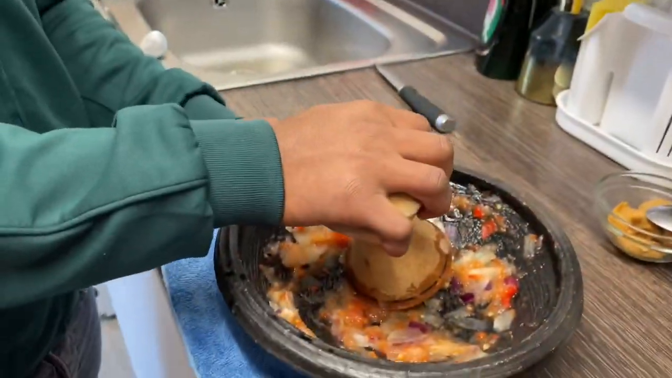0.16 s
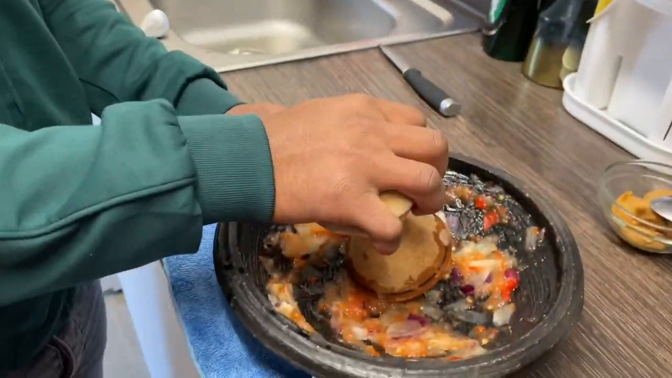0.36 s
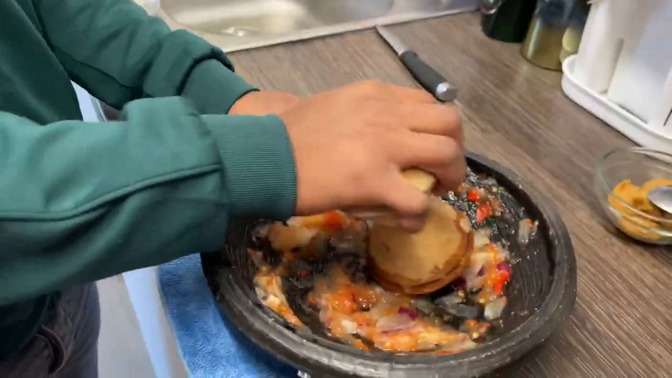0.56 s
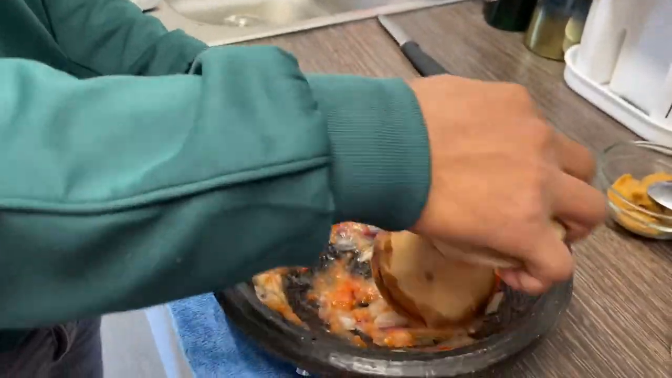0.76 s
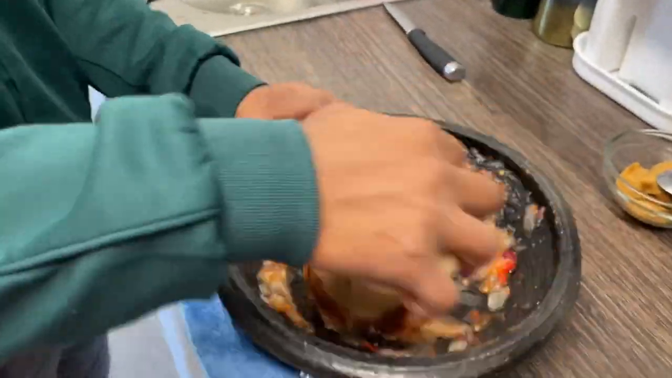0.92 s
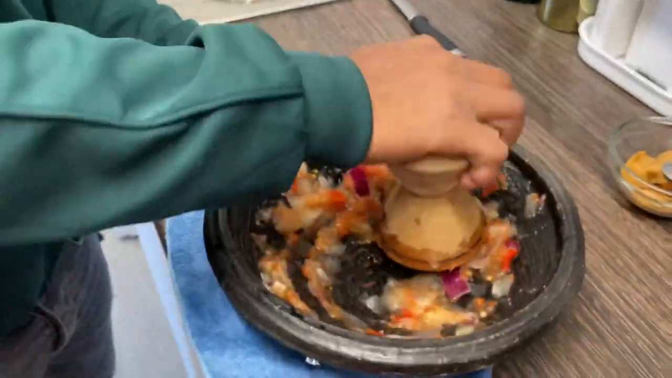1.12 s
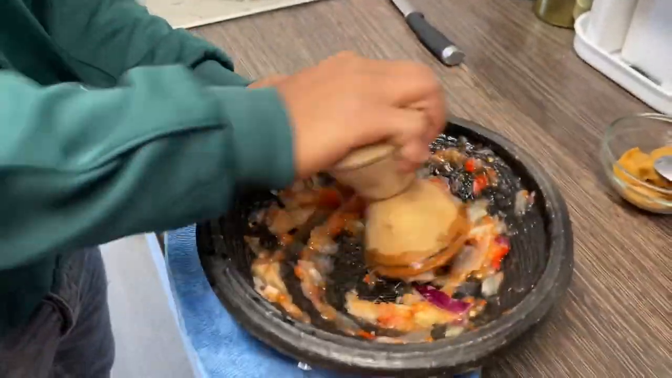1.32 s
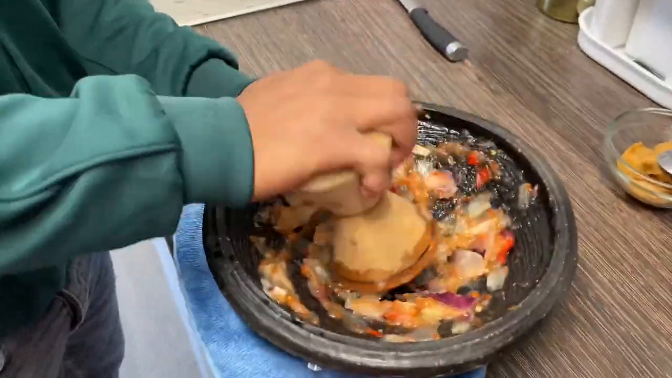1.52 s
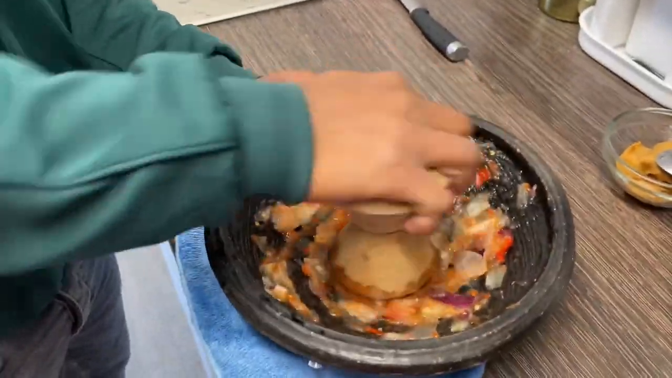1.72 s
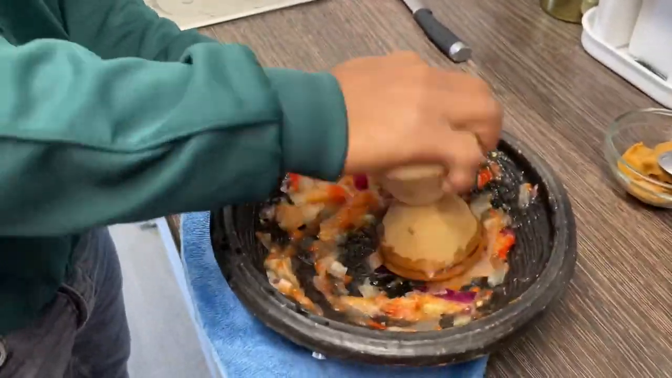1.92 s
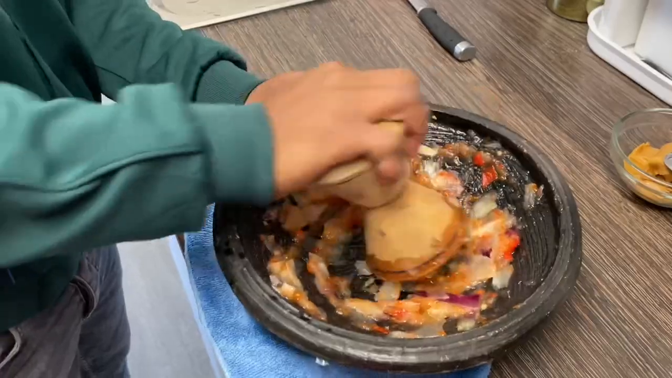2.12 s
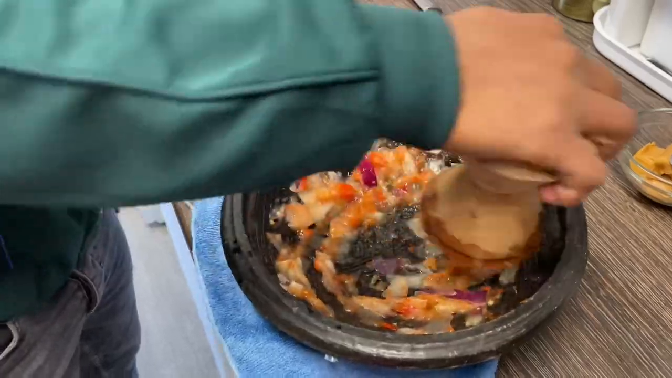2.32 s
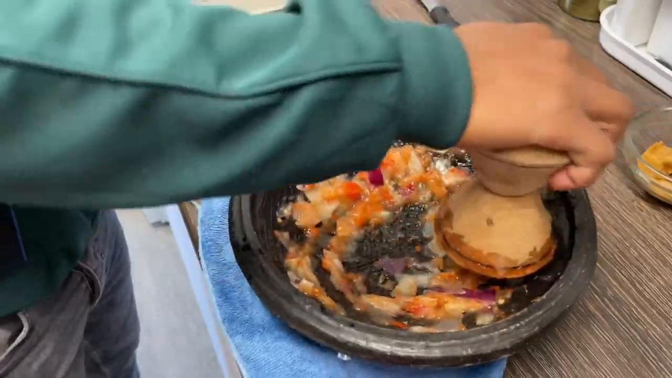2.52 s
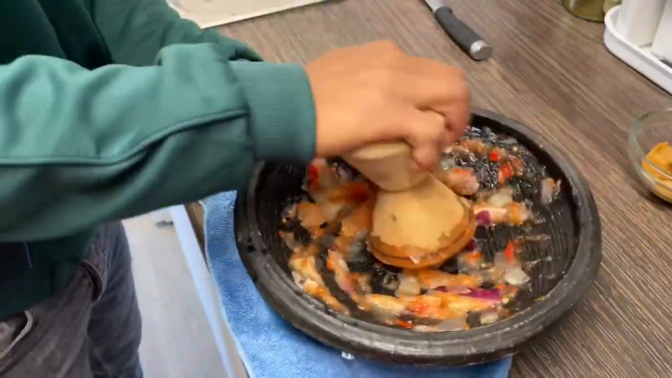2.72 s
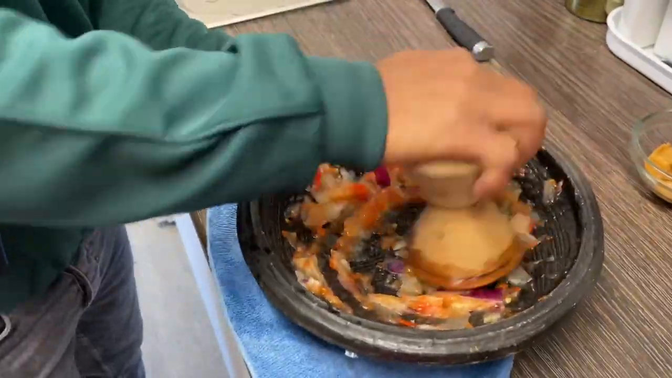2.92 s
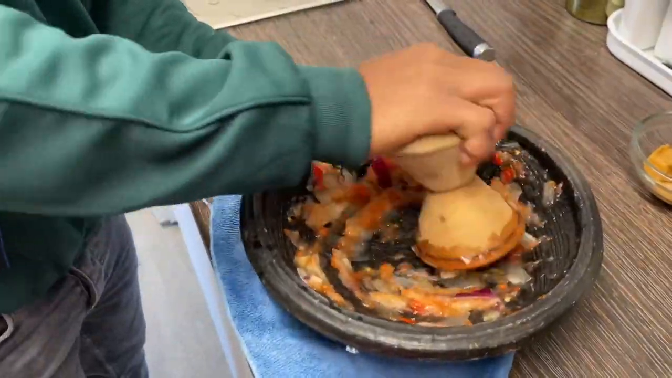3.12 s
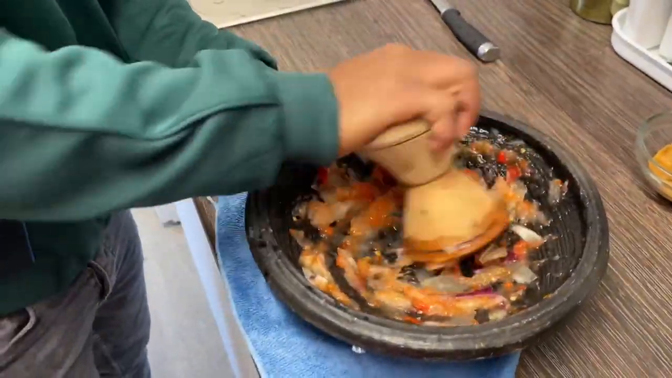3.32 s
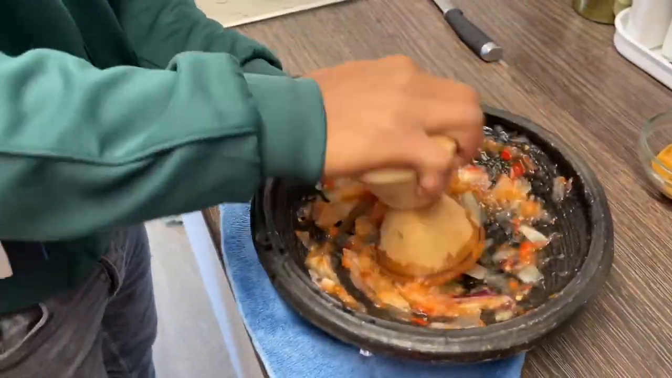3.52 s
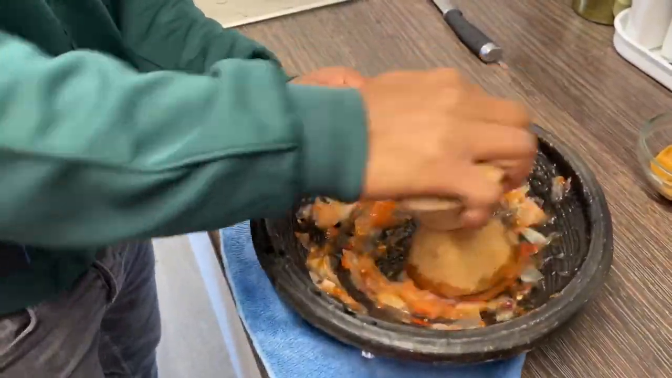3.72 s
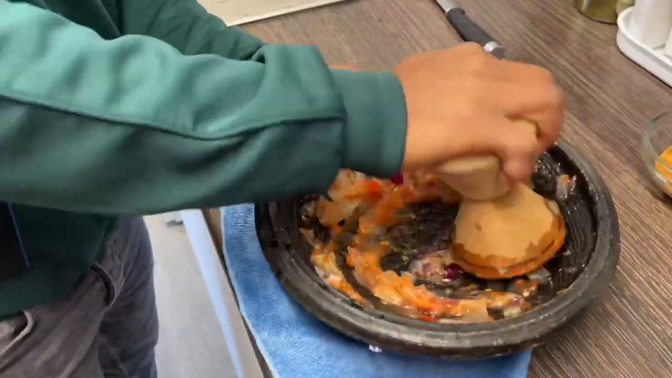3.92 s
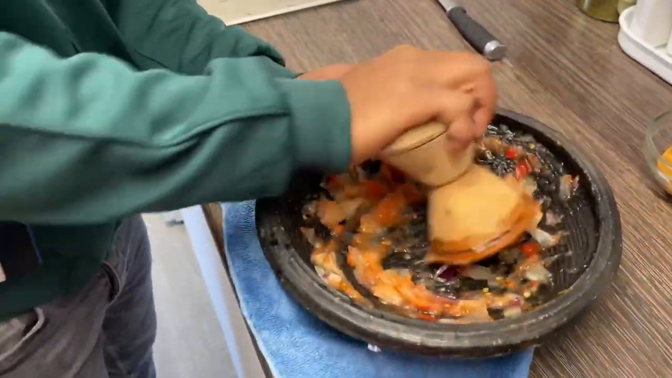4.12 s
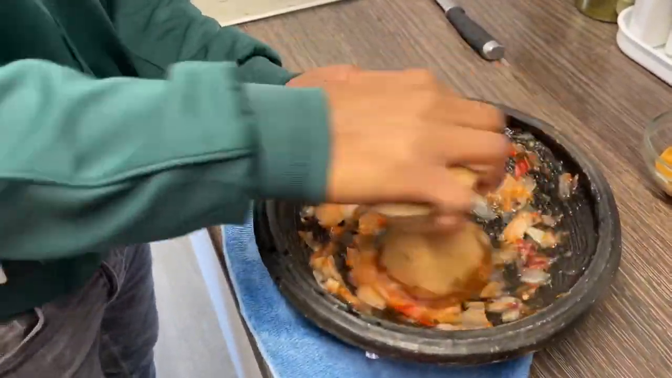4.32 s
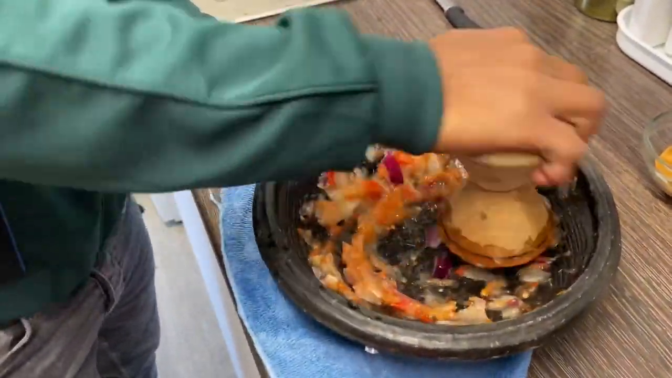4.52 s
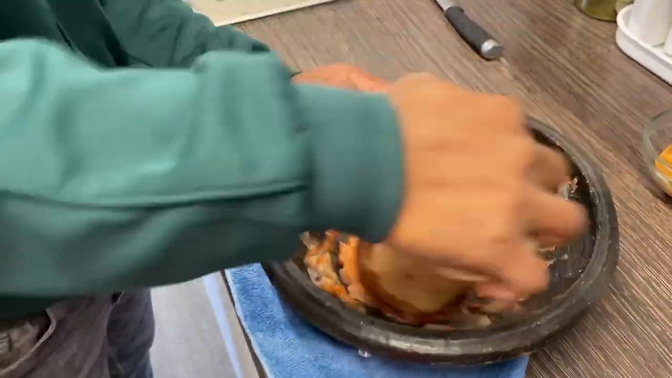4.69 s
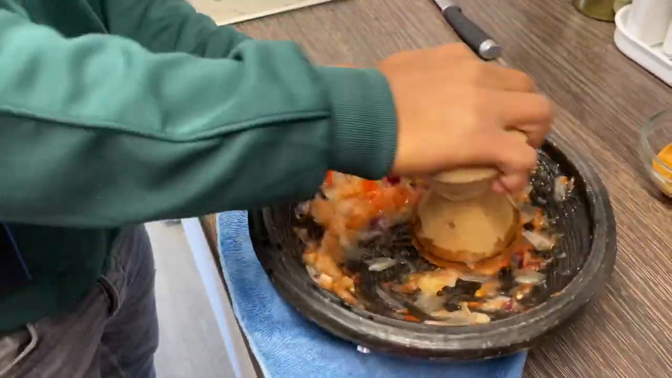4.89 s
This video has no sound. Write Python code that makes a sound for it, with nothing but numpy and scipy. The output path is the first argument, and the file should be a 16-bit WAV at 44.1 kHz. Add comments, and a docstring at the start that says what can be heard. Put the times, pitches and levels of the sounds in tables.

```python
"""On a kitchen counter, close to a phone, a wooden pestle is rocked hard in a ridged clay bowl.
Pushes swing the counter in low thuds; knocks ring the bowl's modes; the hand's weight trembles below.
Vegetable fibres snap in short noise bursts; sparse grains through resonances make scrape, rattle and crackle.
A steady filtered hiss and a short noise tail make the small room; two ports hear the treble out of step."""
import sys
import numpy as np
from scipy import signal
from scipy.fft import rfft, irfft, next_fast_len
from scipy.io import wavfile
from scipy.ndimage import map_coordinates

SR = 44100
rng = np.random.default_rng(int(sys.argv[2]) if len(sys.argv) > 2 else 0)


def to_wav(s):
    """Save 16-bit WAV."""
    ch = np.atleast_2d(s).T  # columns
    pcm = np.round(np.clip(ch, -1, 1) * 32767)  # PCM
    wavfile.write(sys.argv[1], SR, pcm.astype(np.int16))


def volts_from_decibels(level):
    """Turn decibel levels (scalar or array-like) into linear amplitude factors."""
    exponent = np.asarray(level, float) / 20
    return 10 ** exponent


N = 222822

# steady background, part shared by the ports and part opposed: hz, level_db (relative)
HISS_SHARED = [(15, -51), (30, -7), (50, -11), (97, 2), (237, -6), (628, -12.5), (800, -20.5),
               (1600, -14.5), (1900, -25), (2500, -45), (3100, -24), (4300, -20.5), (6200, -25.5),
               (7800, -28.5), (11000, -31), (12700, -22.5), (16200, -30)]
HISS_OPPOSED = [(15, -57.5), (25, -40), (70, -1), (271, -4), (310, -7.5), (869, -13.5), (1530, -16.5),
                (2070, -19.5), (5340, -20.5), (9170, -14), (9950, -21), (12700, -24.5), (16200, -52)]
# narrow bands standing out of the hiss: centre_hz, width_hz, lift_db
HISS_BANDS = [(273, 15, 2.5), (1382, 240, 10), (4190, 280, 7.5), (5174, 115, 12), (10070, 136, 14),
              (12190, 360, 10)]
# strokes over the ridges, a time below 5 ms acting as 5 ms:
# full_pressure_s, hold_s, scrape_db, wet_crackle_db, rise_20db_s, fall_20db_s
STROKES = [(0.493, 0.01, -57.5, -62, 0.18, 0), (0.536, .01, -56, -71.5, 0.3, 0.05),
           (0.565, 0.01, -53.5, -60, -0.12, -0.14), (0.9, .03, -54, -51, 0.2, 0),
           (0.96, .07, -48.5, -54, -0.05, 0.16), (1.137, .02, -51.5, -55, -0.55, 0.1),
           (1.24, .015, -47.5, -58, 0, 0), (1.28, 0.05, -45.5, -47.5, 0.09, 0.22),
           (1.468, 0.068, -46.5, -50, -0.4, 0.15), (1.58, 0.021, -49, -55.5, -0.33, 0.34),
           (1.73, .04, -52, -47, -0.47, 0), (1.81, 0.049, -45.5, -47, -0.12, 0.1),
           (1.921, .06, -55, -59, -0.4, 0.5), (2.008, 0.013, -50, -62, -0.5, 0.02),
           (2.081, 0.071, -47, -58.5, -0.5, 0.04), (2.2, .01, -51.5, -49, -0.22, -0.1),
           (2.598, .03, -55, -51.5, -0.13, 0.05), (2.695, .02, -50.5, -56.5, 0.03, -0.36),
           (2.783, 0.02, -41.5, -52, -0.15, 0.05), (2.76, 0.014, -53.5, -60, -0.06, 0.1),
           (2.881, 0.013, -46, -47.5, -0.26, 0), (2.92, 0.037, -53, -51.5, 0, 0.5),
           (3.03, 0.021, -47.5, -50, -0.17, 0.1), (3.05, 0.0097, -41, -42.5, -0.07, 0),
           (3.08, 0.021, -44.5, -42, -0.22, 0), (3.149, .1, -55.5, -62, 0, 1.3),
           (3.283, 0.048, -42, -45, -0.15, 0.01), (3.38, 0.041, -50, -49.5, -0.3, 0.5),
           (3.535, .02, -42, -53.5, 0.01, -0.2), (3.56, 0.043, -39, -52, 0.06, -0.1),
           (3.62, 0.017, -47.5, -46.5, -0.42, -0.33), (3.68, 0.067, -52.5, -56, 0.4, -0.2),
           (3.8, .03, -43.5, -49, 0.03, -0.04), (3.83, 0.036, -40, -42.5, 0, -0.14),
           (3.9, 0.018, -54, -55, 0.6, 0.2), (3.99, .02, -53.5, -53, 0.15, 0.5),
           (4.035, .01, -46, -46, -0.23, -0.05), (4.07, .025, -49.5, -51, -0.04, 0),
           (4.113, 0.018, -40.5, -47.5, -0.15, 0.08), (4.159, .015, -50, -61, -0.4, 0.06),
           (4.222, 0.11, -57, -52, -1.8, 0), (4.383, 0.023, -49, -47, -0.05, 0),
           (4.416, .04, -43, -46.5, 0, 0.1), (4.485, 0.024, -48, -46, -0.35, 0),
           (4.699, .06, -53.5, -51.5, 0, 0), (4.785, 0.048, -41, -42.5, 0.02, 0.03),
           (4.85, .04, -54, -53.5, -0.35, 0.1), (4.985, 0.011, -48.5, -58, -0.8, 0.1),
           (5.035, .03, -45.5, -56, -0.3, 6)]
# floor between strokes: rattle_db, scrape_db, crackle_db
REST_LEVELS = (-57, -72, -58.5)
# the hand's steady weight, trembling through the counter: time_s, level_db
HAND_WEIGHT = [(0, -53.5), (0.6, -50.5), (0.84, -51.5), (0.95, -30), (1.1, -45.5), (1.6, -41), (2.2, -40),
               (2.32, -51.5), (2.45, -42.5), (3.2, -42), (3.6, -39), (4.5, -41), (4.6, -47.5), (4.75, -50),
               (5.05, -36)]
# colour of the counter's tremble: hz, level_db (relative)
COUNTER_COLOUR = [(15, -61), (25, -26), (65, -0.5), (113, 1.5), (144, -4), (203, -19.5), (231, -21),
                  (257, -55), (330, -25), (430, -99), (730, -120)]
# squeak pitches of the ridges under the wood: pitch_hz, width_hz, level_db
RIDGES = [(873, 304, -3), (1540, 720, -3.5), (1950, 200, -3.5), (2174, 68, -6), (2650, 150, -6.5),
          (3030, 710, -9), (3705, 81, -10.5), (4570, 190, -9)]
# colour of the treble of snaps and pulp: hz, level_db (relative)
FIZZ = [(1000, -26), (2500, -13), (5200, -3.5), (6200, -10), (9000, 3), (10200, -11.5), (12800, -13),
        (14000, -15.5), (15800, -22), (17000, -58)]
# tilt of the pulp's fine crackle over that colour: hz, gain_db
PULP_TILT = [(3000, 1), (6500, -2), (11000, -0.4)]
# the bowl's modes: mode_hz, level_db, undamped_t60_s
BOWL_MODES = [(271, 2, 0.18), (365.5, 2, 0.12), (434, 5, 0.12), (500, 5, 0.11), (590, -2, 0.092),
              (647, 3, 0.075), (763, -0.5, 0.045), (872, 3, 0.078), (1029, 0, 0.076), (1230, -1, 0.06),
              (1465, -2.5, 0.064), (1786, -7.5, 0.068), (2020, -9, 0.072), (2520, -13.5, 0.12)]
# pestle against the bowl: start_s, level_db, contact_ms, favoured_hz, spread_octaves, damping (1 = free)
KNOCKS = [(0.3339, -27, 3.6, 655, 0.14, 2.9), (0.381, -26, 2.1, 640, 0.13, 2.9),
          (0.42, -27, 2.3, 598, 0.15, 3.3), (.460, -27, 2, 606, 0.17, 3.5),
          (.888, -32, 1.2, 890, 1.55, 2.4), (.900, -26, 0.35, 563, 0.89, 5.1),
          (.931, -24.5, 2.3, 623, 0.3, 2.5), (.977, -24.5, 3.9, 623, 0.36, 6.4),
          (1.138, -38.5, 1.9, 630, 1.1, 0.99), (1.463, -33.5, 1.1, 510, 1.14, 7.5),
          (1.72, -25.5, 1.1, 720, 1.1, 2), (2.3648, -13, 0.5, 1190, 1.24, 2.6),
          (3.297, -41.5, 1, 500, 1.3, 1.3), (3.557, -43, 1.4, 633, 1.1, 1.5),
          (3.755, -29.5, 1.6, 590, 0.14, 4.4), (4.415, -35, 2.4, 560, 1, 2.9),
          (4.44, -35.5, 1.3, 860, 0.24, 4.8), (4.628, -29.5, 0.52, 1194, 0.088, 5.3),
          (4.633, -32, 1.8, 434, 0.085, 1.4), (4.686, -21, 1.4, 885, 1.08, 3.7),
          (4.9752, -29, 0.65, 1970, 0.54, 3.1)]
# low thuds of pushes and the low bodies of knocks: peak_s, level_db, pitch_hz, rise_ms
THUDS = [(0.344, -32, 174, 3.8), (0.387, -27, 177, 3.2), (0.427, -25.5, 170, 1.2), (0.467, -29.5, 169, 2),
         (0.345, -39, 283, 6.8), (0.392, -34, 280, 5.8), (0.431, -32.5, 273, 6.6),
         (0.472, -36.5, 279, 10.5), (0.514, -35, 99, 13.7), (0.874, -35, 120, 10), (0.905, -18, 125, 5.9),
         (0.923, -18, 117, 11), (0.912, -30.5, 225, 7.7), (0.939, -16.5, 103, 9.3), (0.95, -34, 240, 25.1),
         (0.959, -21, 111, 30), (0.984, -24, 106, 9.8), (1.012, -29, 114, 23), (1.043, -28, 105, 9.5),
         (1.069, -36, 87, 18), (1.205, -28, 117, 13.4), (1.272, -28.5, 98, 15.5), (1.435, -28.5, 106, 17),
         (1.479, -15.5, 111, 12.3), (1.514, -22.5, 104, 15.3), (1.738, -16, 120, 10.4),
         (1.788, -30, 119, 14), (1.859, -24.5, 101, 18), (2.03, -23.5, 116, 10), (2.109, -21, 111, 22.4),
         (2.211, -30, 107, 8.7), (2.388, -18.5, 101, 7.7), (2.423, -28, 101, 11.4), (2.45, -33, 95, 7.5),
         (2.494, -25.5, 113, 14), (2.592, -27.5, 111, 9.5), (2.615, -28, 116, 13.2),
         (2.701, -29, 90.6, 7.6), (2.729, -27.5, 93, 15), (2.801, -36, 99, 17), (2.833, -26.5, 109, 11.7),
         (2.905, -31, 121, 14.7), (2.994, -32.5, 102, 22), (3.06, -27.5, 117, 11), (3.124, -29, 103, 17),
         (3.31, -36, 235, 22), (3.322, -23.5, 116, 21.8), (3.353, -21, 112, 10), (3.386, -23.5, 107, 7.6),
         (3.436, -28, 105, 12.7), (3.527, -17, 109, 12.2), (3.561, -30, 108, 12), (3.579, -28, 122, 9),
         (3.616, -28.5, 90, 13), (3.686, -31, 100, 11), (3.726, -31.5, 113, 16), (3.771, -21, 125, 8.8),
         (3.809, -28, 108, 9.3), (3.854, -27.5, 113, 11), (3.881, -27.5, 100, 6.7), (3.931, -26, 108, 7),
         (3.96, -34, 108, 7.2), (4.002, -24, 100, 11), (4.031, -32.5, 103, 6.7), (4.133, -24.5, 103, 13.9),
         (4.157, -22.5, 122, 6.2), (4.186, -31, 108, 10), (4.259, -24, 104, 11.5), (4.285, -31, 108, 8.5),
         (4.319, -37, 112, 14), (4.36, -30.5, 104, 7.7), (4.387, -25, 104, 11.7), (4.434, -22.5, 117, 11),
         (4.462, -25, 116, 9), (4.478, -28, 114, 15), (4.514, -28.5, 118, 15.6), (4.644, -29, 112, 14),
         (4.702, -16, 120, 10.5), (4.723, -18.5, 97, 9.8), (4.752, -25.5, 116, 14), (4.772, -25, 120, 15),
         (4.74, -34, 235, 25), (4.718, -34.5, 75, 16), (4.807, -26.5, 111, 35), (4.86, -34.5, 111, 19.2),
         (4.914, -30.5, 108, 13.5), (4.959, -32, 95, 13.7), (4.992, -17.5, 114, 11.7),
         (5.026, -23.5, 108, 12.4)]
# clear snaps of fibre: crack_s, body_db, centre_hz, treble_db, length_ms
SNAPS = [(0.7846, -37, 1950, -39.5, 8.9), (0.8888, -49, 2320, -38, 5), (1.085, -32.5, 3200, -49, 2),
         (1.1097, -31.5, 3050, -58.5, 1.4), (1.137, -33, 1640, -57, 4.4), (1.1976, -30, 4000, -40, 5.2),
         (1.327, -28.5, 3060, -40.5, 11), (1.3402, -28.5, 1770, -47, 3.6), (1.3826, -27.5, 4830, -35, 3.6),
         (1.4584, -16.5, 4500, -23, 2.3), (1.4588, -16, 2490, -29.5, 1.6), (1.4646, -18.5, 2460, -42, 4.5),
         (1.6047, -25, 4260, -22.5, 2.5), (1.611, -59, 5180, -20.5, 3.4), (1.6464, -26.5, 3140, -52, 6.8),
         (1.6523, -19.5, 4130, -36, 3.9), (1.6607, -44, 4270, -24, 2.5), (1.717, -24.5, 2980, -19.5, 6.2),
         (1.7232, -24.5, 3040, -30, 3.6), (1.765, -27, 2950, -37, 5.4), (1.8591, -26.5, 4600, -33, 3.4),
         (1.9149, -34.5, 4500, -30.5, 1.4), (1.92, -45.5, 3600, -25.5, 6.2),
         (2.0045, -28.5, 2420, -27.5, 3.1), (2.1842, -16, 1700, -25.5, 0.83), (2.1875, -23, 1550, -18, 3.4),
         (2.1897, -17.5, 3100, -25, 2.8), (2.3641, -37, 1400, -28, 5.4), (2.452, -61, 2660, -26, 1.3),
         (2.5012, -51.5, 1860, -32.5, 2.1), (2.5787, -34.5, 2980, -23.5, 3.4),
         (2.5905, -29, 3270, -23, 2.9), (2.686, -19.5, 4160, -47, 2.6), (2.784, -28.5, 1940, -53, 3),
         (2.8088, -29, 2020, -47, 2.2), (2.842, -29.5, 2730, -31.5, 1.3), (2.884, -37, 1350, -57, 7.3),
         (2.9072, -26, 4600, -53.5, 1.1), (2.9654, -30, 2700, -46, 1.9), (3.0352, -30.5, 4890, -23, 3),
         (3.0546, -26.5, 2520, -44, 12), (3.1835, -41.5, 3750, -29.5, 2.5), (3.266, -27.5, 1910, -33.5, 5),
         (3.3712, -17, 4800, -25, 3), (3.3724, -15, 2240, -27, 1.2), (3.3746, -27, 4800, -16.5, 1.7),
         (3.3805, -31, 4500, -36, 4), (3.414, -25, 4760, -27, 3.4), (3.417, -31, 1600, -36, 1.8),
         (3.4205, -30, 4030, -21, 1.8), (3.5063, -42, 3740, -25.5, 7.2), (3.561, -25, 2070, -32, 8.9),
         (3.582, -23.5, 2000, -46, 7.6), (3.5931, -42, 4000, -20.5, 2.8), (3.6658, -15, 3070, -17.5, 2.6),
         (3.6665, -17, 5040, -29, 1.8), (3.709, -25, 1870, -24, 3.1), (3.825, -28, 2600, -44.5, 2.3),
         (3.8316, -18, 5600, -49, 1), (3.8608, -24.5, 2520, -31, 5.7), (3.888, -34, 2850, -23.5, 2.8),
         (3.8997, -29, 2650, -43, 3.6), (3.9473, -41, 4970, -26, 1.3), (3.9853, -26, 4000, -19.5, 3.5),
         (3.993, -31, 2130, -42, 1.8), (4.012, -35.5, 1500, -46, 2.2), (4.0973, -26, 2340, -39, 2.7),
         (4.123, -34, 2100, -33, 11), (4.1368, -41, 2100, -40, 5.7), (4.1612, -35, 5000, -27, 1.5),
         (4.1655, -32, 5200, -20, 1.4), (4.1743, -52, 3300, -32, 1.3), (4.211, -36, 2520, -45, 1.5),
         (4.217, -33, 4800, -46.5, 1.6), (4.2692, -37, 3640, -34, 8.8), (4.2944, -42, 1630, -33, 3.4),
         (4.4179, -28.5, 4160, -27, 4.9), (4.445, -28.5, 1950, -45, 8.6), (4.457, -35.5, 1930, -61, 1.9),
         (4.4815, -21, 2380, -33, 5), (4.4908, -40, 3880, -28.5, 10), (4.499, -28.5, 2700, -42, 3.9),
         (4.6292, -35, 1470, -40, 6.1), (4.6864, -57, 1490, -30.5, 3.1), (4.786, -38, 2760, -24.5, 1.6),
         (4.845, -37, 1800, -52, 5.4), (4.88, -30, 3000, -34, 1.8), (4.9088, -31, 4300, -44, 0.56),
         (4.9755, -23, 2020, -30, 0.81)]
# room decay: hz, t60_s
KITCHEN_DECAY = [(200, 0.23), (1000, 0.046), (4000, 0.17), (12000, 0.081)]
# phase between the ports: hz, left_lead_rad
PORT_PHASE = [(300, .1), (600, .4), (1200, .5), (5200, .7), (5800, -1.4), (6500, -.8), (7500, -2.8),
              (9600, -3.5), (12500, -6.1), (16000, -6.4)]
# balance of the ports: hz, left_over_right_db
PORT_BALANCE = [(60, -2.5), (110, -4.5), (200, -8), (380, 1), (700, -2), (1290, -8), (2380, -2),
                (4400, -0.5), (8120, 5), (15000, -5)]
# gains of the sum and difference of the two channels, the shared sound almost vanishing near 8-9 kHz: hz,
# gain_db
SUM_COLOUR = [(30, -2.5), (60, 0), (7000, 0), (7600, -4), (8200, -19), (9200, -22), (9700, -1), (13000, 2),
              (14500, -2.5), (15700, 1), (16000, -41)]
DIFFERENCE_COLOUR = [(3000, -0.5), (6800, 1), (8200, -12), (10500, -0.5), (12300, 0), (13200, -11),
                     (16000, -34)]


def unit(x):
    """Scale to rms 1."""
    return x / np.sqrt(np.mean(x ** 2) + 1e-20)


def along(points, hz):
    """Read (hz, value) points on a log frequency axis."""
    f, v = np.transpose(points)
    return np.interp(np.log(hz + 1), np.log(f + 1), v)


def wobble(rate):
    """A smooth random curve with rate knots a second."""
    knots = rng.standard_normal(int(N * rate / SR) + 4)
    return map_coordinates(knots, [np.arange(N) * rate / SR])


def filtered(x, response):
    """Filter x by a complex response of frequency in Hz."""
    m = next_fast_len(x.shape[-1] + 8192)
    spectrum = rfft(x, m) * response(np.fft.rfftfreq(m, 1 / SR))
    return irfft(spectrum, m)[..., :x.shape[-1]]


def resonance(f, hz, width):
    """A causal resonance, gain 1 at its centre."""
    return 1j * f * width / (hz * hz - f * f + 1j * f * width)


def placed(times, sounds):
    """Sum one row of sound at each time in seconds."""
    at = np.round(times * SR).astype(int)[:, None] + np.arange(sounds.shape[1])
    return np.bincount(np.clip(at, 0, N).ravel(), sounds.ravel(), N + 1)[:N]


def grains(per_s, spread_db):
    """Sparse random impulses of uneven size, scaled to rms 1."""
    chance, size = rng.random(N), rng.standard_normal(N)
    return unit((chance < per_s / SR) * size * volts_from_decibels(spread_db * rng.exponential(size=N)))


def hiss():
    """Steady noise: a coloured part shared by the ports and a part opposed between them."""
    def colour(f):
        bands = sum(db * np.exp(-((f - hz) / width) ** 2) for hz, width, db in HISS_BANDS)
        return volts_from_decibels(np.array([along(HISS_SHARED, f), along(HISS_OPPOSED, f) - 4]) + bands)

    shared, opposed = filtered(rng.standard_normal((2, N)), colour)
    shared_rms_db = -50.5
    return volts_from_decibels(shared_rms_db) * np.array([shared + opposed, shared - opposed]) / np.std(shared)


def swells(s, hold, db, rise, fall, rounded):
    """Power of swells held from s on, sloping 20 dB per rise or fall time away from a rounded top."""
    late = np.arange(0, N + 64, 64) / SR - s[:, None]  # one point every 64 samples
    hold, rise, fall = np.maximum([hold, rise, fall], 0.005)[:, :, None]
    away = np.where(late < 0, late / rise, np.maximum(late - hold, 0) / fall)
    drop_db = 20 * (np.hypot(away, rounded) - rounded)
    power = volts_from_decibels(2 * (db[:, None] - drop_db)).sum(0)
    return np.interp(np.arange(N), np.arange(len(power)) * 64, power)


def stroke_levels():
    """dB curves of tremble, shiver, rattle, scrape, crackle: strokes lead, broad knocks leave a shiver."""
    rattle_over_scrape_db, lean_over_scrape_db = -9, 1.5
    shiver_over_knock_db, shiver_t60_s = -20.5, 0.32
    s, hold, scrape_db, crackle_db, rise, fall = np.transpose(STROKES)
    scrape = swells(s, hold, scrape_db, rise, fall, rounded=0.091)
    crackle = swells(s, hold, crackle_db, rise, fall, rounded=0.22)
    at, knock_db, _, _, spread, _ = np.transpose(KNOCKS)
    shiver_db = knock_db + shiver_over_knock_db + 40 * np.log10(spread)
    zero = 0 * at
    shiver = swells(at + 0.0014, zero, shiver_db, zero + 0.0062, zero + shiver_t60_s / 3, rounded=0)
    steady_db = np.interp(np.arange(N) / SR, *np.transpose(HAND_WEIGHT))
    weight = volts_from_decibels(2 * steady_db) + volts_from_decibels(2 * lean_over_scrape_db) * scrape
    rubs = np.array([volts_from_decibels(2 * rattle_over_scrape_db) * scrape, scrape, crackle])
    rubs = rubs + volts_from_decibels(2 * np.array(REST_LEVELS))[:, None]
    return 10 * np.log10([weight, shiver + 1e-20, *rubs])


def tremble(weight_db):
    """The hand's weight trembles through the counter as unsteady low noise."""
    noise = unit(filtered(rng.standard_normal(N), lambda f: volts_from_decibels(along(COUNTER_COLOUR, f))))
    return volts_from_decibels(weight_db + 2.5 * wobble(25)) * noise


def ridge_squeaks():
    """Wet wood slips over the ridges in short squeaks, with hard specks of grit under it."""
    clumps = volts_from_decibels(3 * wobble(120))
    squeaks = 0
    for hz, width, db in RIDGES:  # each pitch catches at its own moments
        slips = grains(per_s=1500, spread_db=2) * volts_from_decibels(4 * wobble(70) + 1.5 * wobble(14))
        squeak = filtered(slips, lambda f: resonance(f, hz, width) * resonance(f, hz, 3 * width))
        squeaks = squeaks + volts_from_decibels(db) * unit(squeak)
    specks = grains(per_s=1200, spread_db=3.0) * clumps
    grit = filtered(specks, lambda f: resonance(f, hz=2200, width=1300) ** 2)
    return unit(squeaks) + volts_from_decibels(-4) * unit(grit)


def bowl_response(f):
    """The bowl's modes as broad parallel resonances of alternating sign."""
    return sum((-1) ** k * volts_from_decibels(db) * resonance(f, hz, 6 / t60) for k, (hz, db, t60) in enumerate(BOWL_MODES))


def rubbing(shiver_db, rattle_db, scrape_db, crackle_db):
    """Rubbing wood squeaks on the ridges and shakes the bowl, while the pulp crackles finely."""
    shaking = grains(per_s=1200, spread_db=1.5) * volts_from_decibels(3.5 * wobble(50))
    rattle = filtered(shaking, bowl_response)
    shiver = filtered(grains(per_s=5700, spread_db=-1.0), lambda f: bowl_response(f) * resonance(f, 780, 1000))
    bursting = grains(per_s=3000, spread_db=0.5) * volts_from_decibels(3.4 * wobble(60))
    pulp = filtered(bursting, lambda f: volts_from_decibels(along(FIZZ, f) + along(PULP_TILT, f)))
    shaken_bowl = volts_from_decibels(shiver_db) * unit(shiver) + volts_from_decibels(rattle_db) * unit(rattle)
    return shaken_bowl + volts_from_decibels(scrape_db) * unit(ridge_squeaks()) + volts_from_decibels(crackle_db) * unit(pulp)


def knocks():
    """Where the pestle lands favours some bowl modes; a longer contact swells more slowly."""
    s, db, contact, centre, spread, damping = np.transpose(KNOCKS)[:, :, None]
    t = np.arange(SR // 4) / SR
    luck_db = rng.normal(0, 2, (len(s), len(BOWL_MODES)))
    ring = 0
    for k, (hz, level, t60) in enumerate(BOWL_MODES):
        swell = 1 - np.exp(-(t * 1000 / contact * hz / centre) ** 2)  # low modes build later
        favoured = 0.13 + np.exp(-(np.log2(hz / centre) / spread) ** 2)
        decay = volts_from_decibels(level + luck_db[:, [k]] - 60 * t * damping / t60)
        ring = ring + favoured * swell * decay * np.sin(2 * np.pi * hz * t)
    ring = ring / np.abs(ring).max(1, keepdims=True)
    # the first touch ticks high
    graze = rng.standard_normal(ring.shape) * volts_from_decibels(-60 * t / 0.016)
    tick = filtered(graze, lambda f: resonance(f, 2370, 320) - resonance(f, 4170, 740)
                    + 0.71 * resonance(f, 7200, 620))
    # a square blow, one that spreads over many modes, clacks first and rings less
    squareness = np.clip(spread - 0.3, 0, 1)
    u = t * centre / 0.67  # the clack's envelope rises over 0.67 cycles
    clack = squareness * u * np.exp(1 - u) * np.sin(2 * np.pi * centre * t)
    ring = volts_from_decibels(-5.5 * squareness) * ring
    return placed(s[:, 0], volts_from_decibels(db) * (ring + volts_from_decibels(-0.1) * clack + volts_from_decibels(-2.0 - 11 * spread) * tick))


def thuds():
    """Pushes and the low bodies of knocks swing for a few cycles, with a weaker upper mode at 235 Hz."""
    s, db, hz, rise = np.transpose(THUDS)[:, :, None]
    rise_s = rise / 1000
    t = np.arange(SR // 5) / SR
    phase = 2 * np.pi * rng.random((len(s), 1))
    u = t / rise_s
    swell = (u * np.exp(1 - u)) ** 3.23
    main = np.cos(2 * np.pi * hz * (t - rise_s))  # every thud swings the same way at its peak
    upper = volts_from_decibels(-22.0) * swell * np.sin(2 * np.pi * 235 * t + phase)  # swelled twice, so it dies sooner
    swings = volts_from_decibels(db) * swell * (main + upper)
    swings = filtered(swings, lambda f: resonance(f, 120, 310))  # the counter passes little deep bass
    return placed((s - rise_s)[:, 0], swings)


def snaps(rows):
    """Each fibre snaps as a crack inside a short burst, with its own centre and spit of treble."""
    s, db, hz, treble_db, length = np.transpose(rows)[:, :, None]
    rise_ms, fall_ms = 0.59 * length, 0.7 * length  # 9 dB down this long before the crack; 8 dB fall after
    lead = SR // 50
    ms = (np.arange(SR // 12) - lead) * 1000 / SR
    noise = rng.standard_normal((len(s), 2, SR // 12))
    late = np.maximum(ms, 0)
    before = volts_from_decibels(-9 * (ms / rise_ms) ** 2)
    after = volts_from_decibels(-8 * late / fall_ms) + 0.46 * volts_from_decibels(-1.5 * late)  # torn fibres crackle on
    burst = noise * np.where(ms < 0, before, after)[:, None] + 14 * (ms == 0)
    body = filtered(burst[:, 0], lambda f: resonance(f, hz, 0.4 * hz) * resonance(f, hz, 2.5 * hz))
    spit = filtered(burst[:, 1], lambda f: volts_from_decibels(along(FIZZ, f)) * resonance(f, 10600, 7700) ** 2)
    body = body / np.abs(body).max(1, keepdims=True)
    spit = spit / np.abs(spit).max(1, keepdims=True)
    return placed(s[:, 0] - lead / SR, volts_from_decibels(db + 0.5) * body + volts_from_decibels(treble_db + 5.5) * spit)


def small_snaps(scrape_db, count):
    """Rows like the clear snaps, drawn at random, denser where the wood scrapes hard."""
    share = np.cumsum(volts_from_decibels(1.7 * scrape_db))
    s = np.interp(rng.random(count), share / share[-1], np.arange(N) / SR)
    luck = rng.standard_normal((4, count))
    scatter_db = 4
    body_db = -59 + scatter_db * luck[0]
    centre_hz = 2700 * 2 ** luck[1]  # scattered by an octave
    treble_db = -56 + scatter_db * luck[2]
    length_ms = 1.7 * np.exp(0.22 * luck[3])
    return np.transpose([s, body_db, centre_hz, treble_db, length_ms])


def ports(x, opposed):
    """Direct sound meets the two ports unlike in level and phase; the rocking bowl pushes them apart."""
    def half(f):
        return volts_from_decibels(along(PORT_BALANCE, f) / 2) * np.exp(0.5j * along(PORT_PHASE, f))

    rocking = filtered(opposed, lambda f: 1j * resonance(f, 610, 560))
    return filtered(np.array([x + rocking, x - rocking]), lambda f: np.array([half(f), 1 / half(f)]))


def kitchen(x):
    """The room answers 250 samples later with a noise tail, each frequency dying at its own speed."""
    hz, t, z = signal.stft(rng.standard_normal((2, SR // 2)), SR, nperseg=256)
    fade = volts_from_decibels(-60 * t / along(KITCHEN_DECAY, hz)[:, None])
    tail = signal.istft(z * fade, SR, nperseg=256)[1]
    tail = tail / np.linalg.norm(tail[0])
    return signal.fftconvolve(np.pad(x, (250, 0))[None], tail, axes=1)[:, :N]


def scene():
    """Bowl and counter close to the phone, the small room around them."""
    weight_db, *rub_db = stroke_levels()
    scrape_db = rub_db[2]
    low = tremble(weight_db) + thuds()
    wood = knocks()
    food = rubbing(*rub_db) + snaps(SNAPS) + snaps(small_snaps(scrape_db, count=70))
    direct = ports(low + wood + food, opposed=volts_from_decibels(-5.0) * wood + volts_from_decibels(-4.0) * food)
    room = kitchen(volts_from_decibels(-18.0) * low + volts_from_decibels(-10.0) * wood + volts_from_decibels(-11.0) * food)
    return direct + room + hiss()


def low_pass(x):
    """Removes everything above the highest recorded frequency."""
    return signal.sosfilt(signal.butter(12, 16850, fs=SR, output="sos"), x)


def record(dry):
    """Sum and difference of the ports each get their own gains over frequency."""
    pair = np.array([dry[0] + dry[1], dry[0] - dry[1]]) / 2
    mid, side = filtered(pair, lambda f: volts_from_decibels([along(SUM_COLOUR, f), along(DIFFERENCE_COLOUR, f)]))
    return low_pass(np.array([mid + side, mid - side]))


dry = scene()
out = record(dry)
to_wav(out)
```